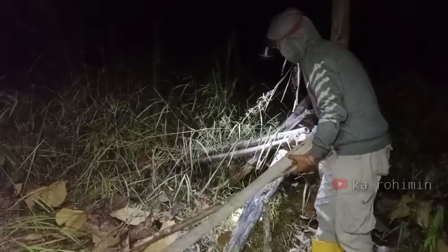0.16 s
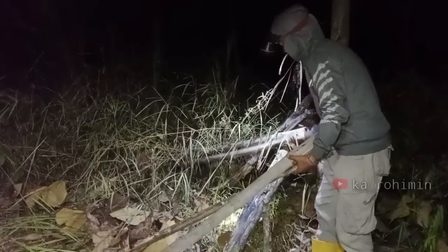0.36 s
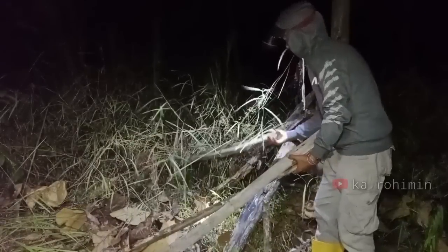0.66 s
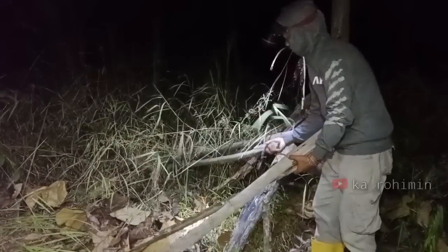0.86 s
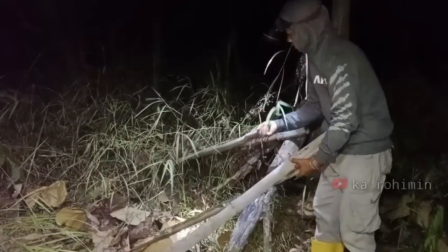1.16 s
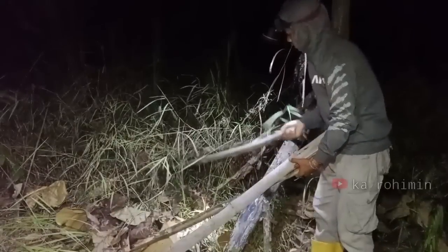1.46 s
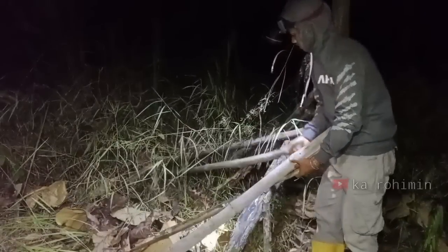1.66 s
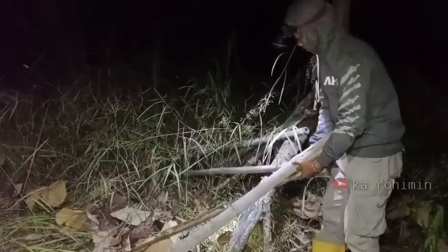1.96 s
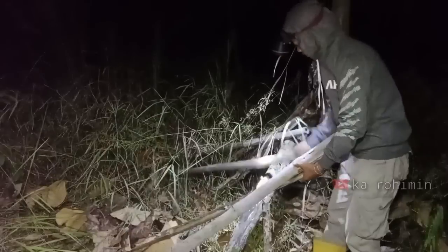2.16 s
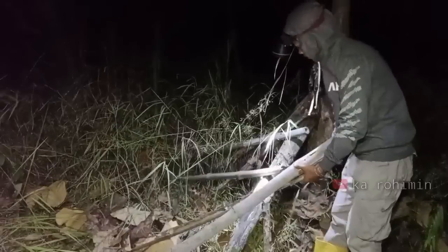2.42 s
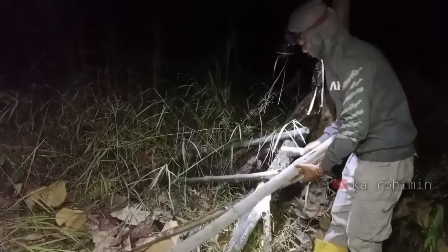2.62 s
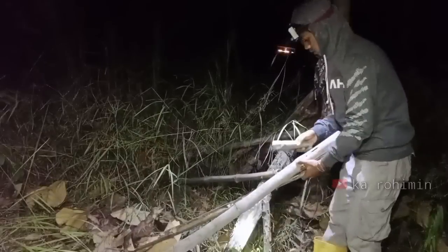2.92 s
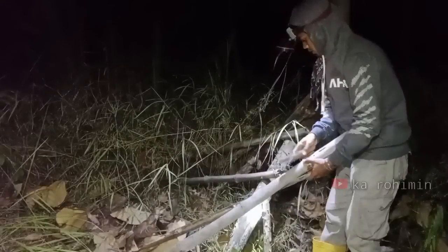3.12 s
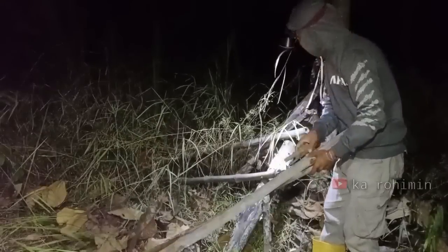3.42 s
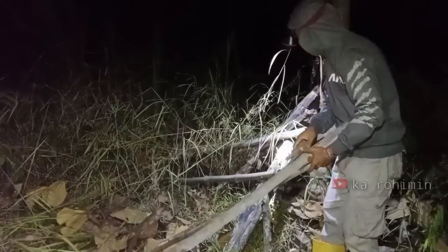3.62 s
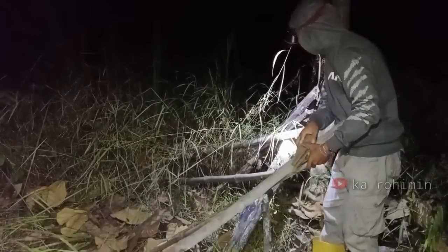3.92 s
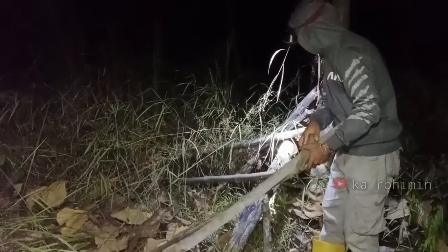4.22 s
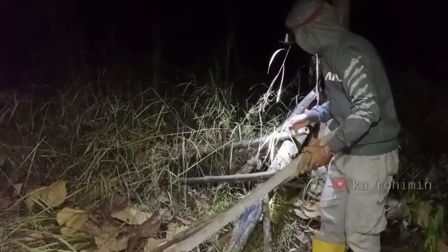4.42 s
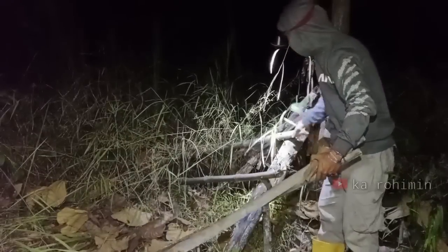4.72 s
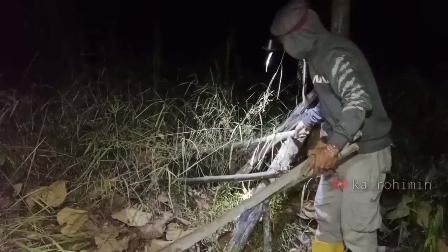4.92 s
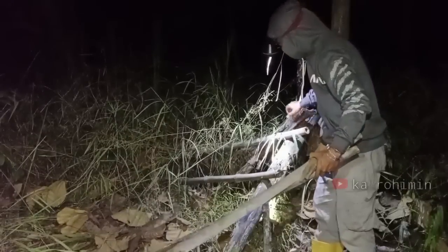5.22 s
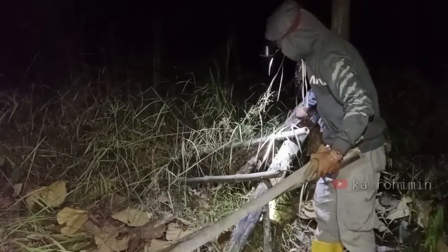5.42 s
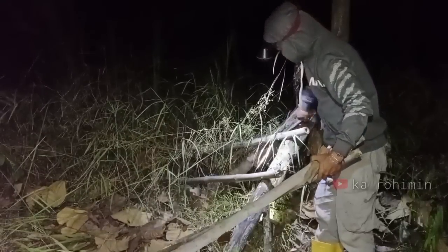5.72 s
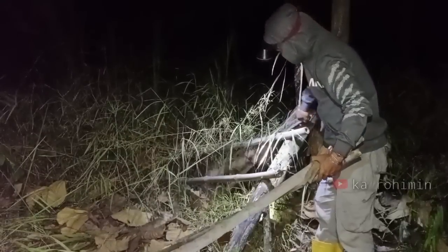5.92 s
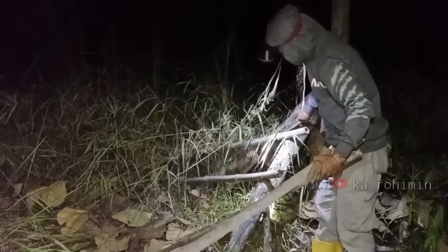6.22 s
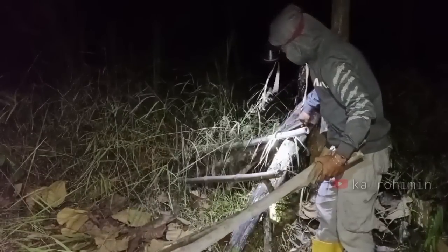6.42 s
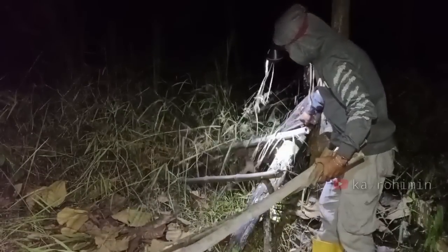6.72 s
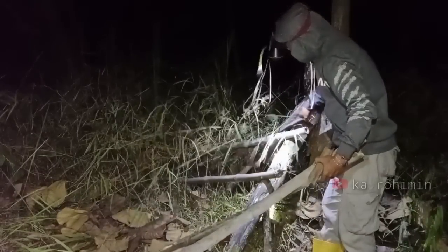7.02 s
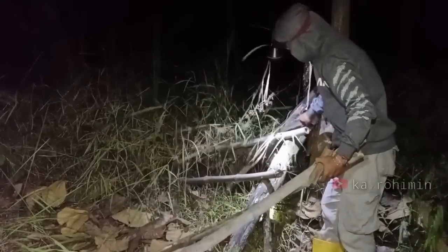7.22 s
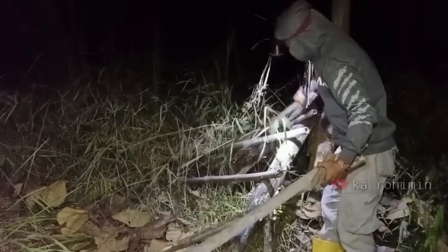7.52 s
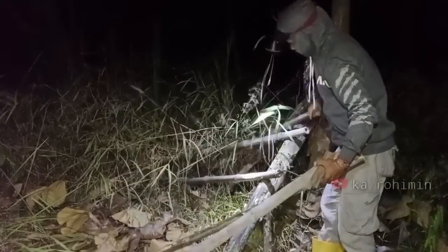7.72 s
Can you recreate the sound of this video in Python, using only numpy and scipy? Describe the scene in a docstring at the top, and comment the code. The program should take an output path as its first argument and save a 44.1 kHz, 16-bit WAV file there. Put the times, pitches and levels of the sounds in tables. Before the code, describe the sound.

Outdoors at night, a thin, steady high chirr of distant insects and faint air hiss run throughout. Close to the microphone, dry bamboo poles and sticks are handled. Small crackles come at 0.1 s, then a sharp crack at 0.56 s with faint leaf rustle after it. Grass and wood scrape around 1.5 s. At 2.4 s a pole splits with by far the loudest, explosive snap, followed by small splinters and light knocks. A heavier drag with a crack and clustered knocks comes at 3.4 to 3.6 s. From 4 to 6 s there are sparse woody taps, a scrape near 4.7 s, faint creaks and rustling. Activity thickens from 6 s: knocks at 6.5, strong cracks and hollow clatter at 6.7 to 6.85, more at 7.1, then a low woody knock and scrape at 7.55, fading into small ticks. Echo is short and faint, scattered by ground and trees.

```python
"""Open ground near trees at night: dry bamboo poles and dead sticks are pulled out of dry grass, close to the
microphone. Random fibre snaps ring the resonances of the poles as they break, knock, rub and drag.
Behind them a chorus of crickets and katydids, made of narrow bands of noise, goes on over faint hiss.
Sparse decaying clicks give the quick scatter near the ground and the faint echo of the trees."""
import sys
import numpy as np
from scipy import signal
from scipy.fft import rfft, irfft
from scipy.io import wavfile
from scipy.ndimage import uniform_filter1d

SR = 44100
rng = np.random.default_rng(int(sys.argv[2]) if len(sys.argv) > 2 else 0)


def bounce(signal):
    """Save signal as a 16-bit WAV file at the path given by the first command-line argument."""
    frames = np.transpose(np.atleast_2d(signal))
    limited = np.clip(frames, -1, 1)
    pcm = np.round(limited * 32767).astype(np.int16)
    wavfile.write(sys.argv[1], SR, pcm)


N = 346626
TIME = np.arange(N) / SR


def from_db(db):
    """Amplitude factor of a level in dB."""
    return 10 ** (np.asarray(db) / 20)


def unit(x):
    """Scales to rms 1."""
    return x / np.sqrt(np.mean(x ** 2) + 1e-20)


def along(points, hz):
    """Reads a table on a logarithmic frequency axis."""
    f, value = np.transpose(points)
    return np.interp(np.log(hz + 1), np.log(f), value)


def add(mix, start_s, sound):
    """Adds a sound to the mix in place, cut off at the end of the mix."""
    part = mix[round(start_s * SR):][:len(sound)]
    part += sound[:len(part)]


def fade_60db(t, t60):
    """Exponential decay that falls by 60 dB in t60 seconds."""
    return np.exp(-np.log(1000) * t / t60)


def shaped_noise(gain):
    """Noise with the given gain at each frequency."""
    return irfft(rfft(rng.standard_normal(N)) * gain, N)


def drift(per_s):
    """Smooth random curve of rms 1, with little movement faster than per_s Hz."""
    hz = np.fft.rfftfreq(N, 1 / SR)
    return unit(shaped_noise(1 / (1 + (hz / per_s) ** 4)))


def response(colour, modes=(), size=4096):
    """Causal, minimum-phase ring of a click with this colour and these resonances."""
    hz = np.fft.rfftfreq(size, 1 / SR)
    peaks = sum(from_db(db) ** 2 / (1 + (2 * (hz - f) / width) ** 2) for f, width, db in modes)
    log_gain = np.log(from_db(along(colour, hz))) + .5 * np.log(1 + 2.2 * peaks)
    # folding the cepstrum forward puts the energy as early as it can be
    cepstrum = irfft(log_gain)
    cepstrum[1:size // 2] *= 2
    cepstrum[size // 2 + 1:] = 0
    return irfft(np.exp(rfft(cepstrum)))


def snaps(count, per_s, spread_db):
    """Random train of tiny snaps; a few are much larger than the rest, or smaller if the spread is negative."""
    size = from_db(spread_db * np.minimum(rng.exponential(1, count), 4))
    return size * rng.choice([-1, 1], count) * (rng.random(count) < per_s / SR)


def blow(drive, ring):
    """Sends a burst through a ring; the energy is that of rms 1 held for 10 ms."""
    sound = signal.fftconvolve(drive, ring)[:len(drive)]
    return sound * np.sqrt(SR / 100 / (np.sum(sound ** 2) + 1e-20))


# Colour of the still night air. Each row: frequency in Hz, relative level in dB.
AIR_COLOUR = [(20, 22), (60, 8), (130, 8.5), (400, -3.5), (900, -11), (1700, -2), (2800, -5.5), (4100, -10),
              (6400, -3), (13800, -4.5), (15300, 3.5)]


def air(level_db=-60.5):
    """Faint even hiss of the night: steady coloured noise."""
    hz = np.fft.rfftfreq(N, 1 / SR)
    return from_db(level_db) * unit(shaped_noise(from_db(along(AIR_COLOUR, hz))))


# Insect choirs far off. Each row: centre in Hz, spread in Hz, level in dB, movement included,
# slow wavering in dB rms, fast flutter in dB rms (a minus sign only turns the random curve over).
INSECT_CHOIRS = [(5237, 141, -52, 0.3, 0.1), (4893, 120, -60.5, -2.1, 0.3), (4517, 76, -71, 2, 1),
                 (7063, 100, -67, -0.3, 4), (10230, 510, -56, 0, 1), (9020, 570, -60, -1, 0.5),
                 (11800, 810, -62.5, 0, 0.5)]


def insects():
    """Many far stridulating insects blur into narrow fluttering bands."""
    hz, out = np.fft.rfftfreq(N, 1 / SR), np.zeros(N)
    for centre, spread, db, waver_db, flutter_db in INSECT_CHOIRS:
        choir = shaped_noise(np.exp(-((hz - centre) / (2 * spread)) ** 2))
        movement_db = waver_db * drift(per_s=4.5) + flutter_db * drift(per_s=68)
        out += from_db(db) * unit(choir * from_db(movement_db))
    return out


# Echo of the trees. Each row: frequency in Hz, time to fall by 60 dB in seconds.
FOREST_DECAY = [(150, 0.37), (800, 0.096), (2000, 0.25), (5000, 0.27), (14000, 0.22)]


def forest(x, near_db=-10, near_t60=0.09, far_db=-23, count=24000):
    """Quick scatter from the ground and the pile, then a faint tail from the trees."""
    t = np.arange(count) / SR
    near = snaps(count, per_s=1900, spread_db=-1.5) * fade_60db(t, near_t60) * (t > .003)
    # the tail dies at its own rate in each frequency band
    clicks = snaps(count, per_s=2100, spread_db=-4.0) * (t > .02)
    hz, when, bands = signal.stft(clicks, SR, nperseg=256)
    fading = bands * fade_60db(when, along(FOREST_DECAY, hz)[:, None])
    far = signal.istft(fading, SR, nperseg=256)[1][:count]
    echo = from_db(near_db) * near / np.linalg.norm(near) + from_db(far_db) * far / np.linalg.norm(far)
    return signal.oaconvolve(x, echo)[:N]


def creaks(per_s=9, level_db=-70, spread_db=3, mean_s=.045, low_hz=1000, high_hz=3664, width_hz=160):
    """Stalks under the load creak faintly all the time: rubs at random moments and pitches."""
    rows = []
    for when, length, note, size in rng.random((int(per_s * N / SR), 4)):
        hz = low_hz * (high_hz / low_hz) ** note
        db = level_db + spread_db * (2 * size - 1)
        rows.append((when * N / SR, mean_s * (.5 + length), hz, width_hz, db))
    return rows


# Poles rub and sing briefly, close by; the low one at 2.095 s is a soft thump.
# Each row: start in seconds, length in seconds, pitch in Hz, resonance width in Hz, level in dB.
POLE_RUBS = [(0.286, 0.066, 1830, 200, -63.5), (0.5506, .007, 2800, 900, -37),
             (0.927, 0.07, 1840, 246, -64.5), (1.761, .045, 750, 30, -53), (1.956, 0.039, 823, 35, -54),
             (2.095, .04, 438, 199, -55), (2.384, 0.014, 2870, 500, -32.5), (3.814, 0.036, 1410, 200, -62),
             (5.126, 0.047, 766, 119, -52), (5.272, .014, 2450, 500, -53), (5.335, 0.028, 1480, 200, -57),
             (5.418, 0.063, 1310, 199, -59), (6.511, 0.037, 1190, 120, -47.5),
             (6.914, 0.011, 2700, 500, -42), (6.946, 0.013, 2720, 503, -49), (7.413, 0.069, 1540, 90, -59),
             (7.834, 0.028, 1170, 88.5, -58)]


def rubs(count=12000):
    """Quick slips keep one resonance going for the length of each row."""
    out = np.zeros(N)
    for start, length, hz, width, db in POLE_RUBS + creaks():
        t = np.arange(int(length * SR)) / SR
        ring = np.sin(2 * np.pi * hz * t) * np.exp(-np.pi * width * t)
        slips = snaps(count, per_s=2100, spread_db=0)  # all of one size
        song = signal.fftconvolve(slips, ring)[len(t):2 * len(t)]  # taken once the ring has built up
        add(out, start, from_db(db) * unit(song * signal.windows.tukey(len(t), .5)))
    return out


# Dry poles split close to the microphone. Each row: start in seconds, level in dB, time the split runs
# in seconds, decay constant in seconds (at least 1 ms is used), note of the pole in Hz, share of that note
# in the energy from 0 to 1, thump in dB relative to the crack, splinters in dB relative to the level.
POLE_BREAKS = [(0.0715, -35, 0.0048, 0.0056, 2520, 0.55, -30, 0.5),
               (0.0888, -33, 0.0022, 0.012, 1540, 0.15, -17.5, 2.5),
               (0.5578, -15.5, 0.0075, 0.0041, 3210, 0.2, -12.5, 1.5),
               (2.3979, -3, 0.015, 0.0071, 3450, 0.22, -3, 1),
               (2.441, -22.5, 0.019, 0.0072, 2960, 0.4, -3, 2.5),
               (3.4675, -21, 0.0016, 0.0018, 1190, 0.01, -19, -8),
               (6.7308, -16.5, 0.0072, 0.0085, 1110, 0.24, -4.5, -5),
               (6.8256, -19.5, 0.00067, 0.0021, 1910, 0.37, -5, 4.5),
               (7.0705, -32, 0.012, 0.011, 1820, .1, -1, 2.5),
               (7.5519, -24.5, 0.0036, 0.0049, 813, 0.6, -10, -21)]
# Sticks knock together. Each row: start in seconds, level in dB, decay constant in seconds, note of the
# stick in Hz, share of that note in the energy from 0 to 1, splinters in dB relative to the level.
STICK_KNOCKS = [(0.632, -38.5, 0.015, 2520, 0.3, -18), (1.0185, -40.5, 0.0083, 1850, 0.7, -9.5),
                (1.95, -51, 0.0061, 1850, 0.7, -8), (2.097, -52, 0.01, 436, 0.85, -27),
                (2.5286, -46, .012, 530, 0.6, -20), (2.6886, -46.5, 0.0095, 2240, .4, -10),
                (2.809, -48, 0.0089, 3040, 0.45, -2), (3.1309, -39.5, 0.013, 1000, 0.3, -10),
                (3.266, -43.5, .004, 1310, 0.2, -1), (3.298, -40.5, 0.0088, 1320, 0, -7),
                (3.407, -37, 0.018, 1690, .25, 0.5), (3.441, -33.5, 0.0087, 1210, .16, -13),
                (3.591, -33.5, .014, 1054, 0.55, -8.5), (4.0185, -42.5, 0.024, 1450, 0.4, -8.5),
                (4.289, -39.5, 0.0022, 1220, 0.1, -12), (4.7823, -35.5, .003, 1700, 0.47, -6.5),
                (4.8882, -40.5, 0.0029, 2720, 0.4, -2.5), (4.928, -37, .003, 1266, 0.87, -18),
                (5.1269, -39.5, 0.0066, 1090, 1, -22), (5.209, -45, 0.01, 1490, 0.93, -20.5),
                (5.819, -39, 0.0038, 1248, 0.4, -26), (5.9813, -43.5, 0.0044, 1340, 0.5, -0.5),
                (6.0961, -32, 0.007, 1970, 0.01, -5.5), (6.4754, -41.5, 0.012, 1590, .1, -15),
                (6.499, -32.5, 0.0047, 1290, 0.96, -3.5), (6.5678, -57.5, 0.0018, 1500, 0, 18.5),
                (6.745, -23, .02, 422, 0.8, -10), (6.7911, -27.5, 0.0066, 1870, .6, -4.5),
                (6.842, -28, .003, 1182, 1, -13), (7.1531, -28.5, .004, 760, 0.44, -19),
                (7.163, -36.5, 0.015, 1000, 0, 1.5), (7.494, -45, 0.011, 1520, 0.6, -4),
                (7.573, -27, 0.0066, 460, 0.75, -5), (7.607, -30.5, 0.032, 950, 1, -2),
                (7.716, -42, 0.018, 1880, 0.4, -5), (7.751, -38, 0.0055, 460, 0.83, -15),
                (7.787, -38.5, 0.0084, 1310, 0.4, -7)]


def blows(thump_db_at_1khz=-11.5, thump_db_per_octave=-24.5):
    """Breaks and knocks as rows of one form; a knock does not run on, and lower sticks thump more."""
    knocks = []
    for start, db, life, hz, share, splinter_db in STICK_KNOCKS:
        thump_db = thump_db_at_1khz + thump_db_per_octave * np.log2(hz / 1000)
        knocks.append((start, db, 0, life, hz, share, thump_db, splinter_db))
    return POLE_BREAKS + knocks


# Held poles never lie quite still: scrape, weight and leaves in dB, before the layers are balanced.
HELD_DB = (-73.5, -79, -71.5)
# Each pull of a pole through the grass; the long row at 0.62 s is leaves rustling faintly.
# Each row: start in seconds, rise in seconds, hold in seconds, then scrape of wood, weight on the ground
# and crackle of leaves in dB, before the layers are balanced.
GRASS_PULLS = [(0.134, 0.013, 0.019, -51.5, -68, -53.5), (0.27, 0.034, 0.027, -70, -73, -73),
               (0.62, .03, 0.54, -83, -93, -61.5), (1.128, 0.041, 0.034, -51.5, -71.5, -56.5),
               (1.463, .17, 0.028, -41, -66, -44), (1.607, 0.023, 0.021, -44.5, -49.5, -59),
               (1.738, 0.027, 0.045, -53, -75, -58), (1.93, 0.024, 0.027, -57.5, -68, -60),
               (2.517, 0.016, 0.057, -54, -48, -72), (2.64, 0.022, 0.072, -54, -72, -58.5),
               (2.921, 0.087, 0.29, -57.5, -69, -65), (3.112, 0.1, 0.16, -46, -51.5, -55.5),
               (3.389, 0.05, 0.12, -34.5, -36.5, -45.5), (3.68, 0.018, 0.13, -55.5, -80, -58.5),
               (4.234, 0.024, 0.016, -57, -70.5, -62.5), (4.623, 0.069, 0.18, -42.5, -47, -55.5),
               (4.947, .02, 0.031, -53.5, -64, -61), (5.167, 0.034, 0.069, -53, -59, -63),
               (5.331, .02, 0.13, -59, -76, -77), (5.745, 0.02, 0.045, -48, -59.5, -58),
               (5.879, .07, 0.058, -49, -59, -51.5), (6.057, 0.075, .22, -47.5, -57, -50.5),
               (6.363, 0.016, 0.15, -51.5, -62, -51.5), (6.612, 0.067, 0.1, -42, -55.5, -51),
               (6.718, .01, 0.099, -36.5, -38, -42.5), (6.897, .02, .05, -44, -53.5, -51.5),
               (7.023, 0.034, 0.1, -45.5, -49, -49.5), (7.334, 0.043, 0.033, -52, -57, -54),
               (7.536, 0.026, 0.043, -35, -35, -40.5), (7.683, .03, 0.029, -44, -51, -51.5),
               (7.805, .03, .03, -54, -76, -46)]


def motion(step_s=.001, release_db_per_s=148.5, shake_db=-12, shake_leaf_db=-5, shake_db_per_s=288.5):
    """Scrape, weight and leaves: each row rises, holds and settles; each blow shakes the pile until it rests."""
    t = np.arange(0, N / SR + step_s, step_s)
    power = np.outer(from_db(HELD_DB) ** 2, np.ones(len(t)))
    for start, rise, hold, *levels_db in GRASS_PULLS:
        settling = np.maximum(t - start - rise - hold, 0)
        rising = np.sin(np.pi / 2 * np.clip((t - start) / rise, 0, 1)) ** 2
        shape = rising * from_db(-release_db_per_s * settling)
        power += np.outer(from_db(levels_db), shape) ** 2
    for start, db, *_, thump_db, splinter_db in blows():
        shape = (t > start) * from_db(db + shake_db - shake_db_per_s * abs(t - start))
        layers_db = [0, min(thump_db, 0), splinter_db + shake_leaf_db]
        power += np.outer(from_db(layers_db), shape) ** 2
    return [np.interp(TIME, t, np.sqrt(p)) for p in power]


def twigs(slips, count=26, t60=.035, contact_step_s=.04):
    """Slips ring the thin sticks, which catch and let go at random; each slip rings one stick."""
    which, t = rng.integers(0, count, N), np.arange(2048) / SR
    moments = np.arange(0, N / SR + 1, contact_step_s)
    out = np.zeros(N)
    notes_hz = np.geomspace(720, 3100, count) * rng.uniform(0.97, 1.03, count)
    for k, hz in enumerate(notes_hz):
        contact_db = 8 * np.clip(rng.standard_normal(len(moments)), -2, 1.3)
        contact = from_db(np.interp(TIME, moments, contact_db))
        ring = np.sin(2 * np.pi * hz * t) * fade_60db(t, t60) / hz ** .2
        out += signal.oaconvolve(slips * (which == k) * contact, ring)[:N]
    return unit(signal.sosfilt(signal.butter(2, 500, "high", fs=SR, output="sos"), out))


# Resonances of the hollow poles. Each row: frequency in Hz, width in Hz, relative strength in dB.
POLE_MODES = [(350, 15, -1), (433, 22, 4.5), (485, 110, 1), (735, 27, -12.5), (980, 100, 6),
              (1190, 420, 7.5), (1700, 160, 3), (2773, 230, 1.5), (2945, 41, -5), (3070, 26, -11.5),
              (3650, 50, -16.5), (3870, 38, 2.5)]
# Colour of the ground thump. Each row: frequency in Hz, relative level in dB.
THUMP_COLOUR = [(20, -49.5), (60, -21.5), (120, -11), (190, -5.5), (260, -12), (340, -3.5), (600, 1.5),
                (800, -4), (1300, -33), (3000, -66)]
# Colour of the woody crack. Each row: frequency in Hz, relative level in dB.
WOOD_COLOUR = [(30, -74), (100, -56.5), (450, -9.5), (750, -16.5), (1150, 4.5), (2200, 9), (3600, 2),
               (4200, -5), (4800, -21.5), (8000, -47), (16000, -66)]
# Colour of the splinters and dry leaves. Each row: frequency in Hz, relative level in dB.
SPLINTER_COLOUR = [(30, -82), (500, -58), (2200, -14), (3400, -0.5), (4100, -6.5), (4800, -17), (5700, -5),
                   (8200, 2), (9200, -5), (10400, 6), (11600, -0.5), (13000, 2), (14000, -8), (15300, -0.5)]


def dragging(scrape, weight, leaves, scrape_db=-2.0, weight_db=-1, leaf_db=3):
    """Dense stick-slip grains sound the poles, the twigs, the ground and the dry leaves."""
    catching = from_db(1.5 * drift(per_s=55))
    slips = catching * snaps(N, per_s=3400, spread_db=3.1)
    crackle = unit(slips) + unit(catching * snaps(N, per_s=600, spread_db=4.8))
    wood = unit(signal.oaconvolve(slips, response(WOOD_COLOUR, POLE_MODES))[:N])
    ground = unit(signal.oaconvolve(slips, response(THUMP_COLOUR, POLE_MODES))[:N])
    rustle = unit(signal.oaconvolve(crackle, response(SPLINTER_COLOUR))[:N])
    sticks = .6 * wood + .8 * twigs(slips)
    dragged = from_db(scrape_db) * scrape * sticks
    dragged += from_db(weight_db) * weight * ground
    return dragged + from_db(leaf_db) * leaves * rustle


def ticks(scrape, per_s=16, level_db=-2, spread_db=5, life_s=0.0027, low_hz=950, high_hz=3040):
    """Small twigs flick at random, at a level relative to the scrape at that moment."""
    share, thump_db, splinter_db = 0.91, -18, -7
    rows = []
    for when, note, size in rng.random((int(per_s * N / SR), 3)):
        at = int(when * N)
        db = 20 * np.log10(scrape[at]) + level_db + spread_db * (2 * size - 1)
        hz = low_hz * (high_hz / low_hz) ** note
        rows.append((at / SR, db, 0, life_s, hz, share, thump_db, splinter_db))
    return strikes(rows)


def strikes(rows, note_cycles=42, count=6000):
    """A first snap and a run of fibre breaks that holds, then dies, ring the pole and the stick's own note."""
    thump = response(THUMP_COLOUR, POLE_MODES)
    wood = response(WOOD_COLOUR, POLE_MODES)
    splinter = response(SPLINTER_COLOUR, POLE_MODES)
    t, out = np.arange(count) / SR, np.zeros(N)
    for start, db, run, life, hz, share, thump_db, splinter_db in rows:
        life, share = max(life, 1e-3), np.clip(share, 0, 1)
        burst = snaps(count, per_s=4000, spread_db=1.8) * np.exp(-np.maximum(t - run, 0) / life)
        # a short break puts more of its force into the first snap
        burst[0] = min(.003 / (life + run), .9) * np.linalg.norm(burst)
        # high notes die sooner: each falls by 60 dB in the same number of cycles
        note = np.cos(2 * np.pi * hz * t) * fade_60db(t, note_cycles / hz)
        body = blow(burst, wood) + from_db(thump_db) * blow(burst, thump)
        body /= np.hypot(1, from_db(thump_db))
        ringing = blow(blow(burst, note), wood + thump)
        sound = np.sqrt(1 - share) * body + np.sqrt(share) * ringing
        sound += from_db(splinter_db) * blow(burst, splinter)
        add(out, start, from_db(db) * sound)
    return out


def scene():
    """The handled bamboo close by and its echo, over insects and night air."""
    night = air() + insects()
    scrape, weight, leaves = motion()
    bamboo = rubs() + dragging(scrape, weight, leaves) + ticks(scrape) + strikes(blows())
    return (night + forest(bamboo) + bamboo)[None]


def record(dry, knee_db=-17, squeeze=0.4, recover_db_per_s=90, low_cut_hz=70, edge_hz=15580, ceiling=.64):
    """At the microphone, gain control ducks loud snaps and recovers, peaks are rounded, the band is limited."""
    power_db = 10 * np.log10(abs(uniform_filter1d(dry[0] ** 2, size=300)) + 1e-12)
    # the held level jumps up with a peak and falls at a steady rate
    fall_db = TIME * recover_db_per_s
    held_db = np.maximum.accumulate(power_db + fall_db) - fall_db
    over_db = np.maximum(held_db - knee_db, 0)
    ducked = dry * from_db(-squeeze * uniform_filter1d(over_db, size=100))
    rounded = ceiling * np.tanh(ducked / ceiling)
    lean = signal.sosfilt(signal.butter(2, low_cut_hz, "high", fs=SR, output="sos"), rounded)
    treble_cut = signal.firwin(401, edge_hz, window=("kaiser", 9), fs=SR)
    return signal.oaconvolve(lean, treble_cut[None], "same")


dry = scene()
out = record(dry)
bounce(out)
```